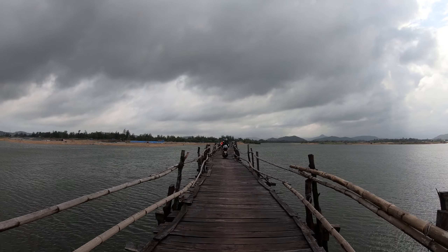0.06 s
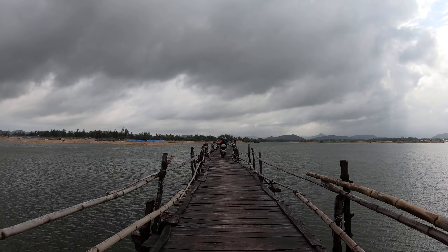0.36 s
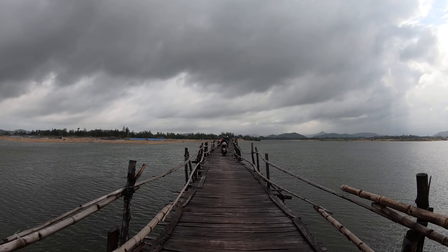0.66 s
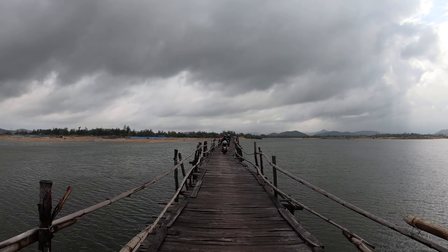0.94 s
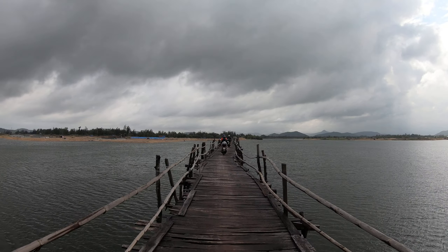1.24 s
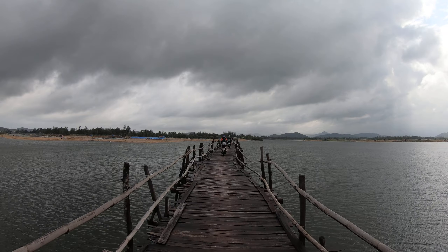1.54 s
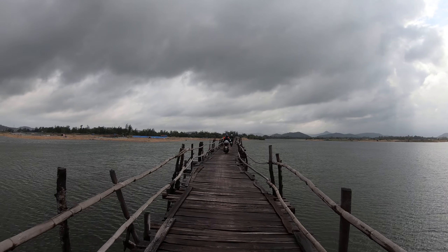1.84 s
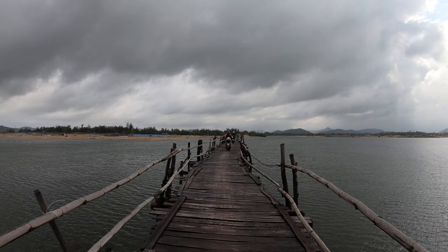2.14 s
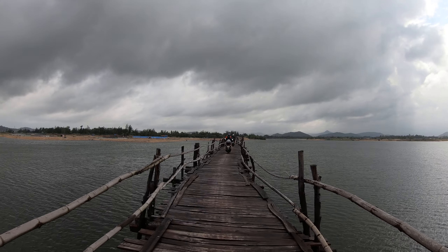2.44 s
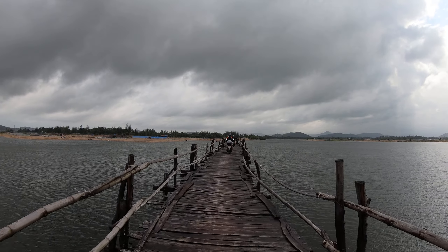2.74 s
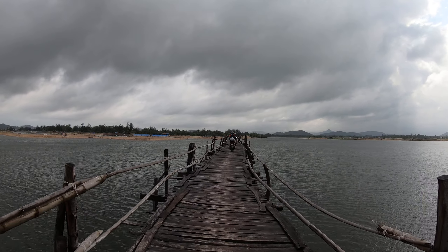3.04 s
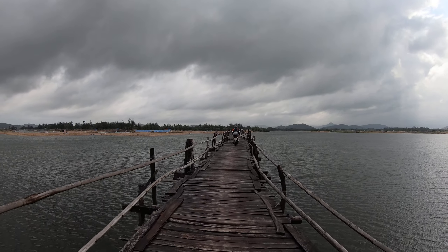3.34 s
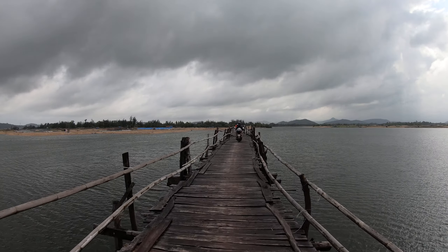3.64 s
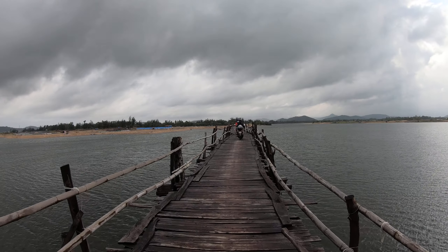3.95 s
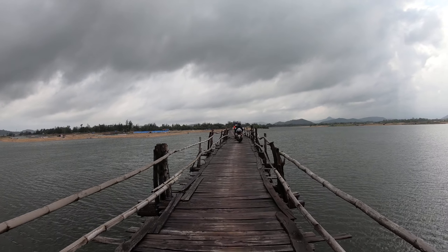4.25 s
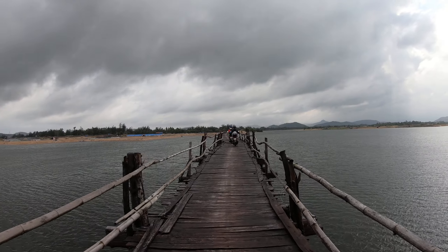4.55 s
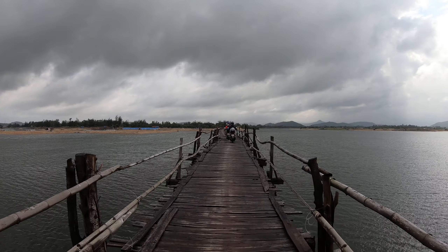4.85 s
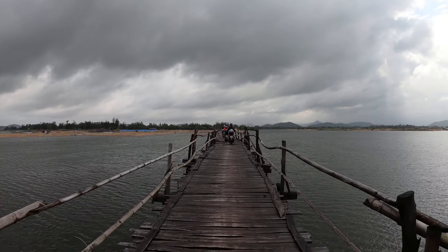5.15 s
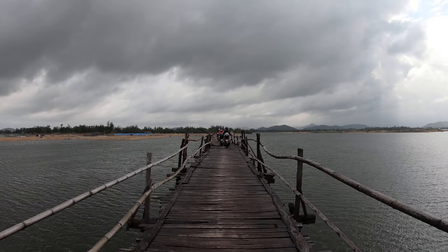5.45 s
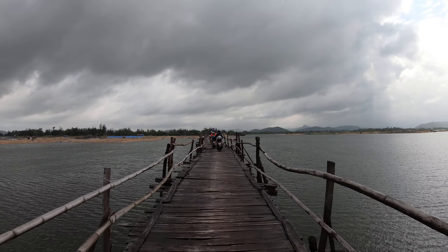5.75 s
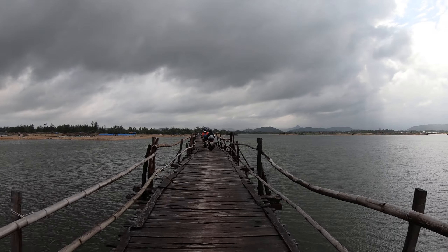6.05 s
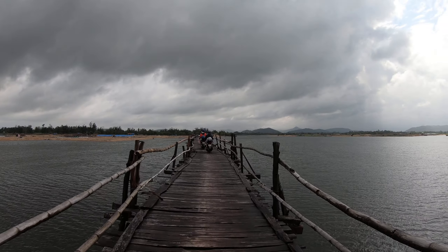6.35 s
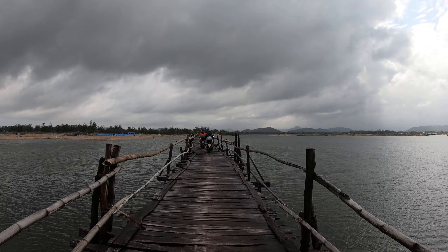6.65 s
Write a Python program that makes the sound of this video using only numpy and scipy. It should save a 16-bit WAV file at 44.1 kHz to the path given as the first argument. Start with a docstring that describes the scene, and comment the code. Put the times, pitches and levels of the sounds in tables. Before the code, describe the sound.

A motorbike putters across a wooden plank bridge, loose boards knocking and rattling under its tyres while wind rushes past the microphone.

```python
"""Motorbike on a plank bridge

A single-cylinder motorbike putters over open water, heard from the rider's seat. Exhaust puffs boom in
the silencer under a changing throttle. The tyres knock loose boards and set the deck rumbling.
A gusty head wind rushes past the microphone; halfway through, the sound turns duller and quieter."""
import sys
import numpy as np
from scipy import signal
from scipy.io import wavfile

SR = 44100
rng = np.random.default_rng(int(sys.argv[2]) if len(sys.argv) > 2 else 0)


def output_pcm(signal):
    """Save a mono or channel-first signal as 16-bit PCM at the path in sys.argv[1].

    Samples are clipped to [-1, 1] before scaling.
    """
    pcm = np.clip(np.atleast_2d(signal).T, -1, 1) * 32767
    wavfile.write(sys.argv[1], SR, np.round(pcm).astype(np.int16))


N = 304290


# engine speed: time_s, firing_hz
ENGINE_SPEED = [(0.0, 27.42), (0.07, 28.36), (1.26, 26.79), (1.31, 25.84), (1.89, 27.76), (2.63, 28.53),
                (2.81, 27.77), (3.63, 27.61), (4.23, 29.06), (4.52, 28.42), (4.59, 29.87), (5.05, 29.72),
                (5.84, 29.6), (6.33, 30.61), (6.9, 29.46)]
# exhaust loudness: time_s, level_db
THROTTLE = [(0, -16.5), (.06, -17.5), (.3, -22.5), (.42, -18.5), (.68, -17.5), (2.9, -20.5), (3.09, -20.5),
            (3.13, -27), (3.45, -27), (3.8, -19), (4.04, -19.5), (4.1, -25), (4.5, -23.5), (4.79, -27.5),
            (4.87, -19), (5.51, -18), (5.57, -32), (5.7, -21), (6.05, -37.5), (6.42, -32), (6.53, -22),
            (6.68, -31.5), (6.9, -27)]
# blow-down and its pipe reflections: delay_s, gain_db
PIPE_ECHOES = [(0, -1.5), (.0061, -2), (0.0172, -9.5)]
# silencer resonances: centre_hz, width_hz, gain_db
SILENCER_MODES = [(58, 44, -31.5), (105, 18, -21), (163.2, 84.7, 5.5), (301.5, 18, -8), (407, 130, -29.5)]

def exhaust():
    """One uneven puff per firing echoes along the pipe and booms in the silencer, deeper under load."""
    firing_hz, = in_time(ENGINE_SPEED)
    level_db, = in_time(THROTTLE)
    first_firing_s = 0.0213
    cycles = np.cumsum(firing_hz) / SR - first_firing_s * firing_hz[0]
    fired_s = np.flatnonzero(np.diff(np.floor(cycles))) / SR
    jitter = rng.standard_normal((len(fired_s), 2))
    fired_s = fired_s + 0.00018 * jitter[:, 0]
    force = from_db(0.65 * jitter[:, 1])
    puffs = sum(clicks(fired_s + delay_s, force * from_db(db)) for delay_s, db in PIPE_ECHOES)
    boom = sum(from_db(db) * resonate(puffs, hz, width_hz) for hz, width_hz, db in SILENCER_MODES)
    load = swell(start_s=1, length_s=1.9, attack_s=0.18, release_s=0.025)
    boom = boom + from_db(1.5) * load * resonate(puffs, hz=136, width_hz=45)
    return from_db(level_db - 0.1) * rms_one(low_pass(boom, 750))


# tyre blows on boards: start_s, clack_db, centre_hz, thud_db
KNOCKS = [(.192, -31, 400, -8), (.404, -18, 750, -26), (1.289, -16, 1190, -24), (1.360, -17, 800, -33),
          (1.638, -10, 900, -22), (1.711, -15, 1310, -35), (1.735, -10.5, 900, -34),
          (1.802, -15.5, 1320, -33), (2.450, -12.5, 480, -16), (2.495, -22, 750, -36),
          (2.740, -27, 1200, -30), (2.769, -16, 580, -14), (2.817, -14, 1100, -14), (3.438, -19, 646, -36),
          (3.909, -21, 600, -22), (3.995, -33, 348, -12), (4.024, -23.5, 550, -6), (4.18, -15.5, 810, -43),
          (4.261, -17.5, 680, -27), (4.277, -22.5, 550, -21), (4.467, -27.5, 1100, -27),
          (4.526, -25, 680, -28), (4.546, -15.5, 650, -9.5), (4.564, -25, 450, -7), (4.832, -14, 1020, -12),
          (4.932, -23, 750, -29), (5.106, -16.5, 700, -12), (5.285, -19, 640, -10), (5.402, -26, 400, -25),
          (5.500, -17, 520, -1), (5.575, -26.5, 1100, -13), (5.666, -18, 650, -10.5),
          (5.806, -24.5, 720, -29), (5.981, -28.5, 520, -12.5), (6.503, -22, 402, -10),
          (6.885, -32, 395, -13.5)]
# dry snaps of a plank edge: start_s, level_db
SNAPS = [(0.426, -33.5), (1.289, -38), (1.638, -30.5), (1.735, -32.5), (2.827, -53), (5.664, -42)]

def loose_boards():
    """A loose board thuds on its bearer, clacks in its own modes, bounces once and ticks at its edge."""
    start_s, clack_db, centre_hz, thud_db = np.transpose(KNOCKS)
    clack = board_ring(start_s, from_db(clack_db - 3), centre_hz, spread_db=4.5)
    bounce_s = start_s + rng.uniform(0.003, 0.01, len(start_s))
    bounce = board_ring(bounce_s, from_db(clack_db - 13), centre_hz, spread_db=7.5)
    blows = clicks(start_s, from_db(thud_db - 3))
    thud = low_pass(thump(blows, hz=189.4, width_hz=87), 700)
    treble_db = np.interp(start_s, *np.transpose(BRIGHTNESS))
    tick = ticks(start_s, clack_db - 9.5 + 1.4 * treble_db, decay_s=0.0039)
    snap_s, snap_db = np.transpose(SNAPS)
    snap = ticks(snap_s, snap_db + 8.5, decay_s=0.0037)
    return clack + bounce + thud + tick + snap


# plank modes: pitch_hz, gain_db, t60_s
BOARD_MODES = [(292.3, 9, 0.03), (340, -0.5, 0.029), (445, -5, 0.031), (515, -2, .022), (685, -3.5, .02),
               (846, -5, 0.0091), (927, -3.5, 0.01), (1100, -6.5, 0.0053), (1624, -6.5, 0.013),
               (1760, -13.5, 0.011), (2300, -4, 0.014)]

def board_ring(times_s, sizes, centre_hz, spread_db):
    """Each blow favours the board modes near its centre frequency, with random strengths."""
    wood = 0
    for k, (hz, db, t60_s) in enumerate(BOARD_MODES):
        octaves = np.log2(hz / centre_hz)
        force = sizes * from_db(db - 8.2 * octaves ** 2 + spread_db * rng.standard_normal(len(times_s)))
        polarity = (-1) ** (k // 2)
        wood = wood + ring(clicks(times_s, force * polarity), hz, t60_s)
    return low_pass(wood, 4100)


def ticks(times_s, level_db, decay_s):
    """Short bright cracks where wood meets wood."""
    blows = clicks(times_s, from_db(level_db))
    envelope = signal.lfilter([1], [1, -np.exp(-1 / (decay_s * SR))], blows)
    return low_pass(band(rng.standard_normal((2, N)) * envelope, 1600, 6500), 7000)


# runs of loose slats: start_s, lift_db, length_s
CLATTERS = [(0.394, 4, .06), (0.494, 1.5, 0.13), (1.234, 5.5, 0.08), (1.322, 6, 0.047), (1.602, 7, 0.07),
            (1.692, 5, 0.13), (2.302, 4, 0.049), (2.808, 6.5, .04), (3.082, 5, 0.077), (3.58, 3, 0.062),
            (4.121, 6, 0.053), (5.387, 5, 0.042), (5.834, 8.5, 0.063), (6.046, 8, 0.07),
            (6.268, 7.5, 0.024)]

def clatter_lift_db():
    """Brief rises in level as the wheels cross loose slats."""
    return sum(db * swell(start_s, length_s, attack_s=0.0043, release_s=0.043)
               for start_s, db, length_s in CLATTERS)


def slats(rate_hz=90):
    """Light slats rattle at random, following the wind's level, hardest in the clattering runs."""
    hits = np.flatnonzero(rng.random(N) < rate_hz / SR)
    rush_db, = in_time(WIND_LEVEL)
    treble_db, = in_time(BRIGHTNESS)
    level_db = (rush_db + 2 * clatter_lift_db())[hits] + 3.5 + rng.uniform(-1, 1, len(hits))
    clack = board_ring(hits / SR, from_db(level_db), centre_hz=950, spread_db=4)
    return clack + ticks(hits / SR, level_db + treble_db[hits] - 0.5, decay_s=0.0015)


# deck roughness: time_s, rumble_db
ROUGHNESS = [(0, -25.5), (1.7, -31), (2.5, -28.5), (3.4, -35.5), (3.88, -30), (4.3, -34.5), (5.0, -33),
             (6.1, -35.5), (6.25, -47), (6.9, -47)]
# suspension bottoming: start_s, level_db, lean_left_db
BUMPS = [(.19, -16, -3), (0.938, -17, 0), (1.329, -21, 5), (2.429, -13, 3), (2.789, -18, 0.5),
         (3.095, -25, 17.5), (4.32, -19, 6.5), (5.441, -13, -2.5), (6.409, -24.5, -1)]
# frame shake: frequency_hz, density_db
SHAKE_SPECTRUM = [(20, -6.5), (35, -12), (55, 0), (85, -9), (120, 1.5), (200, -5)]

def deck():
    """Tyres patter over plank edges; the frame shakes on its springs and bottoms on hard bumps."""
    rumble_db, = in_time(ROUGHNESS)
    edges_s = np.sort(rng.uniform(0, N / SR, size=1600))
    force = from_db(0.83 * rng.standard_normal(len(edges_s)))
    patter = board_ring(edges_s, force, centre_hz=310, spread_db=6)
    patter = rms_one(band(patter, 210, 560))   # soft rubber leaves only the low modes
    bump_s, bump_db, lean_db = np.transpose(BUMPS)
    jolts = np.array([clicks(bump_s, from_db(bump_db + side * lean_db)) for side in (1, -1)])
    bumps = low_pass(thump(jolts, hz=66, width_hz=45), 400)
    shake = turbulence(SHAKE_SPECTRUM, patchy_db=1.5, eddy_hz=3.2, bands=6)
    return from_db(rumble_db - 2) * patter + from_db(0.26 * rumble_db - 22) * shake + bumps


# loose spans: middle_s, level_db, half_length_s
DRONES = [(3.881, -33.5, 0.092), (4.4, -39.5, 0.28), (5.328, -30.5, 0.13), (5.59, -34.5, 0.13),
          (5.958, -43, 0.18)]

def hollow_spans(pitch_hz=368, sway_hz=85):
    """Rolling tyres make each loose span drone in one broad resonance that swells and fades."""
    t = np.arange(N) / SR
    level = sum(from_db(db) * np.exp(-((t - middle_s) / half_s) ** 2) for middle_s, db, half_s in DRONES)
    sway = rms_one(low_pass(rng.standard_normal((2, N)), sway_hz))
    phase = 2 * np.pi * pitch_hz * t
    return level * (sway[0] * np.cos(phase) + sway[1] * np.sin(phase))


# wind noise: time_s, rush_db
WIND_LEVEL = [(0, -31), (1.1, -34.5), (1.55, -33.5), (2.0, -35.5), (3.1, -36.5), (3.3, -42.5), (3.88, -38),
              (4.2, -44.5), (4.34, -49.5), (4.55, -37), (4.72, -41.5), (4.92, -33.5), (5.15, -41),
              (5.42, -39), (5.54, -47.5), (5.75, -55.5), (6.3, -54.5), (6.55, -45.5), (6.9, -44.5)]
# treble relative to the rush: time_s, treble_db
BRIGHTNESS = [(0, -16.5), (2.0, -15.5), (3.1, -12.5), (3.8, -24), (5.4, -22), (5.75, -17.5), (6.2, -13),
              (6.9, -18)]
# topmost hiss: time_s, level_db
TOP_HISS_LEVEL = [(0, -53.5), (2.0, -59), (2.4, -55.5), (3.18, -55), (3.35, -64.5), (3.75, -82.5),
                  (4.3, -84), (6.9, -91.5)]
# midrange rush: frequency_hz, density_db
RUSH_SPECTRUM = [(120, -20), (350, 3), (680, 3), (850, -2), (1100, 3), (1400, -5), (1900, -4.5),
                 (2500, -20), (3300, -32)]
# hiss: frequency_hz, density_db
HISS_SPECTRUM = [(1700, -5), (2500, 5.5), (3300, 1.5), (4500, -3.5), (5800, -16.5), (7500, -26.5)]
# topmost hiss: frequency_hz, density_db
TOP_HISS_SPECTRUM = [(4500, -10.5), (6000, 4), (7500, 2), (9700, -6), (11000, -16.5), (12200, -12.5),
                     (15000, -23.5)]

def wind():
    """Air tears past the housing, more on the right; eddies and clatter lift all its bands together."""
    rush_db, = in_time(WIND_LEVEL)
    treble_db, = in_time(BRIGHTNESS)
    top_db, = in_time(TOP_HISS_LEVEL)
    eddies_db = 1.5 * drift(45) + 0.27 * drift(2.3)
    tilt = 0.67 * (treble_db + 15.5)   # the rush dulls as the hiss dies down
    rush = turbulence(RUSH_SPECTRUM, patchy_db=1.5, eddy_hz=23, bands=15, tilt_db_per_octave=tilt)
    hiss = turbulence(HISS_SPECTRUM, patchy_db=2.5, eddy_hz=46, bands=8)
    top = turbulence(TOP_HISS_SPECTRUM, patchy_db=3, eddy_hz=50, bands=7)
    air = from_db(rush_db + 2) * rush + from_db(rush_db + treble_db + 5) * hiss
    air = air + from_db(top_db - 2) * top
    balance = from_db([[-2.2], [2.2]])
    return air * from_db(0.94 * clatter_lift_db() + eddies_db - 1.79) * balance


# wind on the left port: frequency_hz, density_db
BUFFET_SPECTRUM = [(22, -1), (60, -6.5), (110, -9), (170, -4.5), (450, -8.5), (1100, -25)]

def buffet(start_s=3.086, rise_s=0.0094, blast_db_per_s=-546, wake_db_per_s=-28):
    """A lumpy blast of air hits the left microphone port alone, then trails a weaker wake."""
    t = np.arange(N) / SR - start_s
    after_s = np.maximum(t - rise_s, 0)
    blast = from_db(-17.5 + blast_db_per_s * after_s)
    wake = from_db(-28 + wake_db_per_s * after_s)
    level = np.clip(t / rise_s, 0, 1) * (blast + wake)
    left = turbulence(BUFFET_SPECTRUM, patchy_db=4.5, eddy_hz=23, bands=8)[0]
    return np.array([level * left, np.zeros(N)])


# hollow bands of noise: centre_hz, width_hz, gain_db
SWISH_BANDS = [(1853, 540, 2), (2750, 710, -6)]

def swish():
    """Just after the blast, a hollow two-band swish sounds and fades."""
    noise = rng.standard_normal(N)
    hollow = sum(from_db(db) * resonate(noise, hz, width_hz) for hz, width_hz, db in SWISH_BANDS)
    envelope = swell(start_s=3.115, length_s=0.15, attack_s=0.011, release_s=0.42)
    return from_db(-42.5) * envelope * rms_one(hollow)


# faint sizzles: start_s, length_s, level_db
SIZZLES = [(3.3, 0.92, -84), (4.13, 0.029, -72), (5.38, .27, -84)]

def sizzle():
    """A thin band of very high noise, perhaps a dragging brake, comes and goes."""
    level = sum(from_db(db) * swell(start_s, length_s, attack_s=0.03, release_s=0.03)
                for start_s, length_s, db in SIZZLES)
    return level * rms_one(resonate(rng.standard_normal(N), hz=12500, width_hz=2400))


# left-right likeness of the noise: frequency_hz, correlation
COHERENCE = [(30, 0.75), (150, 1), (400, 0.93), (1000, 0.43), (4000, 0), (13000, 0)]

def turbulence(spectrum, patchy_db, eddy_hz, bands, tilt_db_per_octave=0):
    """Stereo noise of rms 1, each band flickering on its own; the tilt acts above 1 kHz."""
    edges_hz = np.geomspace(spectrum[0][0], spectrum[-1][0], bands + 1)
    white = rng.standard_normal((2, 2, N))
    noise = 0
    for k, (low_hz, high_hz) in enumerate(zip(edges_hz, edges_hz[1:])):
        mid, side = band(white[k % 2], low_hz, high_hz)
        hz = np.sqrt(low_hz * high_hz)
        alike = np.clip(at_hz(COHERENCE, hz), 0, 1)
        tilt_db = tilt_db_per_octave * max(np.log2(hz / 1000), 0)
        gain = from_db(at_hz(spectrum, hz) + tilt_db + patchy_db * drift(eddy_hz))
        noise = noise + gain * (np.sqrt(1 + alike) * mid + np.sqrt(1 - alike) * side * [[1], [-1]])
    return rms_one(noise)


def drift(rate_hz):
    """Smooth random wander of spread 1."""
    step, settle = 20, 3000
    r = np.exp(-2 * np.pi * rate_hz * step / SR)
    noise = rng.standard_normal(N // step + settle + 2)
    slow = signal.lfilter([1], [1, -2 * r, r * r], noise)[settle:]
    return np.interp(np.arange(N) / step, np.arange(len(slow)), rms_one(slow))


def swell(start_s, length_s, attack_s, release_s):
    """Linear attack, hold and release; the release passes 0.5 after length_s."""
    t = np.arange(N) / SR - start_s
    return np.clip(np.minimum(t / attack_s, (length_s - t) / release_s + 0.5), 0, 1)


def clicks(times_s, sizes):
    """Single-sample blows."""
    return np.bincount(np.clip(np.asarray(times_s) * SR, 0, N - 1).astype(int), sizes, N) + 1e-18


def resonate(x, hz, width_hz):
    """A resonance applied twice: peak gain 1, steep skirts, soft attack."""
    r = np.exp(-np.pi * width_hz / SR)
    gain = (1 - r * r) / 2
    return signal.sosfilt([[gain, 0, -gain, 1, -2 * r * np.cos(2 * np.pi * hz / SR), r * r]] * 2, x)


def thump(x, hz, width_hz):
    """A unit click swells to a few cycles of height about 1."""
    return resonate(x, hz, width_hz) * SR * np.e / (2 * np.pi * width_hz)


def ring(x, hz, t60_s):
    """A unit click rings a decaying sine of height 1."""
    r, w = np.exp(-np.log(1000) / (t60_s * SR)), 2 * np.pi * hz / SR
    return signal.lfilter([0, np.sin(w)], [1, -2 * r * np.cos(w), r * r], x)


def band(x, low_hz, high_hz):
    """Gentle band-pass."""
    return signal.sosfilt(signal.butter(2, [low_hz, high_hz], "band", fs=SR, output="sos"), x)


def low_pass(x, hz):
    """Steep low-pass."""
    return signal.sosfilt(signal.butter(4, hz, fs=SR, output="sos"), x)


def in_time(rows):
    """Each column of a curve, sample by sample."""
    time_s, *columns = np.transpose(rows)
    return [np.interp(np.arange(N) / SR, time_s, column) for column in columns]


def at_hz(points, hz):
    """Read a spectrum on a log-frequency axis."""
    points_hz, values = np.transpose(points)
    return np.interp(np.log(hz), np.log(points_hz), values)


def from_db(db):
    """Decibels to gain."""
    return 10 ** (np.asarray(db) / 20)


def rms_one(x):
    """Scale to rms 1."""
    return x / np.sqrt(np.mean(x ** 2) + 1e-20)


def scene():
    """Engine, bridge and wind in the open air."""
    ride = exhaust() + loose_boards() + slats() + deck() + hollow_spans()
    return ride + wind() + sizzle() + buffet() + swish()


# stereo width above the bass: time_s, side_db
STEREO_WIDTH = [(0, -39.5), (1.6, -53), (1.9, -22.5), (2.3, -8), (3.2, 0), (3.6, -4.5), (3.9, -17.5),
                (4.3, -14), (4.65, -41.5), (6.9, -46.5)]

def record(dry, bass_hz=520, cutoff_hz=15700):
    """Near mono, opening mid-ride; the bass narrows twice as far in dB, and the top is cut."""
    width = from_db(in_time(STEREO_WIDTH)[0])
    mid, side = (dry[0] + dry[1]) / 2, (dry[0] - dry[1]) / 2
    upper = signal.sosfilt(signal.butter(4, bass_hz, "high", fs=SR, output="sos"), side)
    side = width * upper + width ** 2 * low_pass(side, bass_hz)
    top_cut = signal.cheby2(12, 70, cutoff_hz, fs=SR, output="sos")
    fade_out = np.minimum(np.arange(N)[::-1] / (0.004 * SR), 1)
    return fade_out * signal.sosfilt(top_cut, [mid + side, mid - side])


dry = scene()
out = record(dry)
output_pcm(out)
```